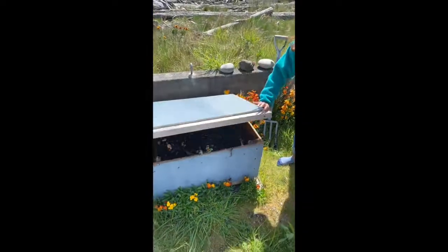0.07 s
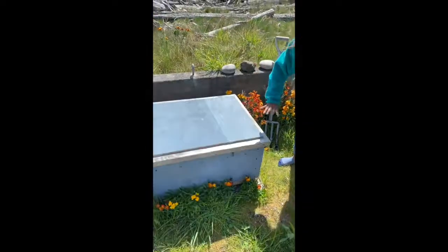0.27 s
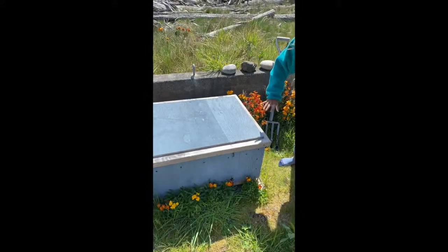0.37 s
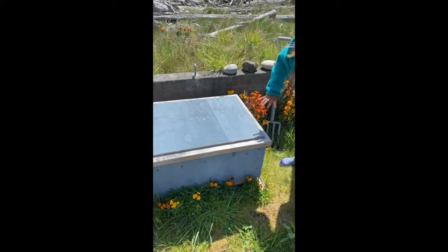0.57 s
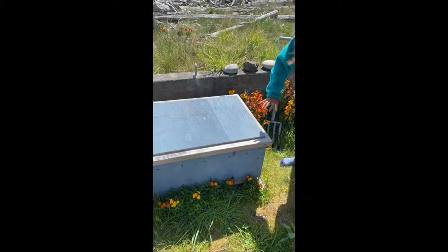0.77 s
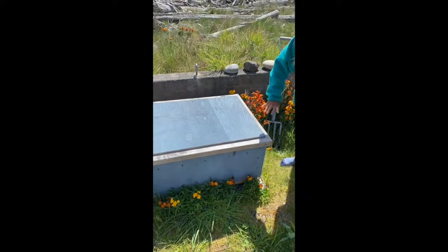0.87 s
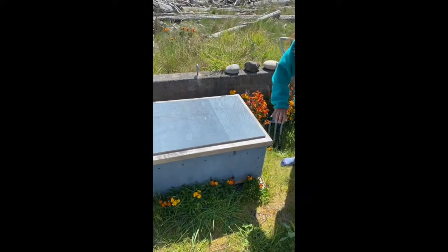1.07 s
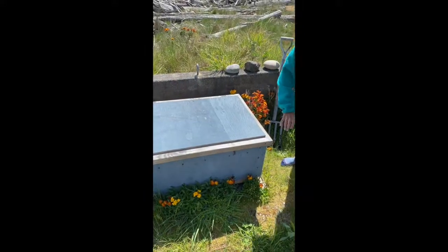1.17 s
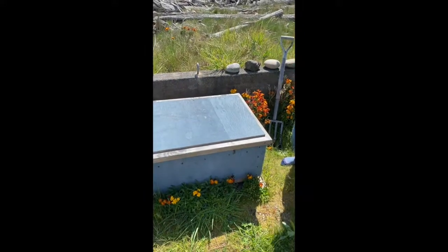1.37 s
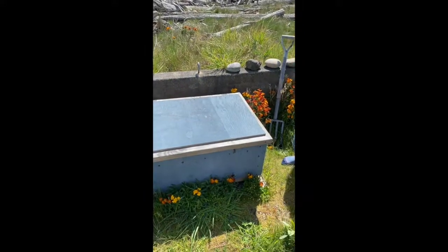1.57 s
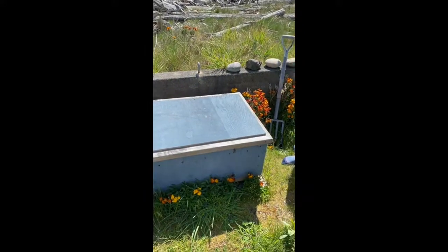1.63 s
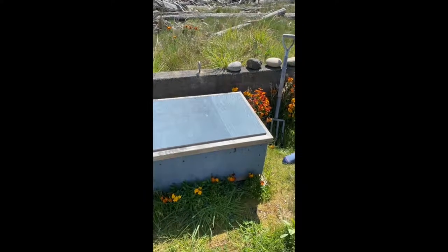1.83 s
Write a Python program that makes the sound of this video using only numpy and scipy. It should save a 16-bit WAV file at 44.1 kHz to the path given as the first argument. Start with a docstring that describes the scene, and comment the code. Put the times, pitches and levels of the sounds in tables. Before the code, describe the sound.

A plastic compost box lid falls with a soft swish and lands at about 0.3 seconds in one sharp, hollow thud, rattling briefly to rest a few steps away. Low, gusty wind buffets the microphone throughout. Faint distant birds whistle at the start, around 1 second and near 1.6 seconds. Clothing and garden plants rustle very lightly, with a few small dry snaps around 1.7 seconds.

```python
"""A plastic compost box lid drops shut in a garden, a few steps away.
From the start: a fading swish of the falling lid, wind buffeting the microphone, far bird whistles.
Clothing and plants rustle from about 0.2 s. At 0.3 s the rim lands in a quick run of contacts,
the panel rings, the box booms, and the lid rattles and ticks to rest.
Wind and birds go on; a thin hiss and small dry snaps come near the end."""
import sys
import numpy as np
from scipy import signal
from scipy.fft import rfft, irfft
from scipy.io import wavfile
from scipy.ndimage import uniform_filter1d

SR = 44100
rng = np.random.default_rng(int(sys.argv[2]) if len(sys.argv) > 2 else 0)


def master(y):
    """Save y as 16-bit WAV."""
    cut = np.clip(np.atleast_2d(y).T, -1, 1)
    pcm = np.round(cut * 32767)  # scale
    wavfile.write(sys.argv[1], SR, pcm.astype(np.int16))


N = 83790
T = np.arange(N) / SR
HZ = np.fft.rfftfreq(N, 1 / SR)

# noise spectra (frequency [Hz], relative density [dB])
AIR_SPECTRUM = [(100, 4), (900, 6.5), (2000, -12.5), (4000, -21), (7000, -23.5), (10000, -44),
                (13000, -25.5), (16000, -25.5)]
SWISH_SPECTRUM = [(300, -9.5), (800, 9), (1200, -4), (2000, -20), (4000, -33.5), (9000, -43)]
RUMBLE_SPECTRUM = [(15, -34.5), (30, -8.5), (48, 3), (70, 9), (110, 3), (170, -1.5), (260, -29),
                   (500, -82.5)]
FLUTTER_SPECTRUM = [(60, -25.5), (140, 0.5), (220, 4), (330, -2), (500, -11.5), (720, -17), (1000, -37),
                    (1500, -48), (2500, -70), (5000, -100)]
GUST_SPECTRUM = [(150, -5), (400, 11), (700, 6), (950, -6), (1400, -9), (2000, -32.5), (4000, -52),
                 (8000, -71)]
RUSTLE_SPECTRUM = [(800, -5.5), (2200, 4.5), (3500, -3.5), (7000, -5.5), (10000, -25.5), (13000, -8.5),
                   (16000, -10.5)]
HISS_SPECTRUM = [(1000, -8), (2200, -3), (4000, -6), (7500, -4.5), (10000, -24), (13000, 0), (16000, 0)]
SNAP_SPECTRUM = [(800, -3), (2500, -9), (7000, -2.5), (10000, -8), (13500, 1.5), (16000, -0.5)]
CRACK_SPECTRUM = [(200, -20), (1000, 15.5), (2000, -13.5), (4000, -6.5), (7800, -11), (9300, -29),
                  (11000, -34), (12800, -20.5), (16000, -26.5)]
RATTLE_SPECTRUM = [(100, 14), (400, 8), (1400, 1), (3000, -16), (5500, -24), (8000, -49.5), (16000, -50.5)]
# stereo width of the noises (frequency [Hz], side minus mid [dB])
NOISE_WIDTH = [(150, -71), (380, -48), (700, -9), (1250, 9.5), (2400, 0.5), (4400, -2.5), (9000, 12),
               (15000, 5)]
# wind on the microphone (time [s], rumble [dB], flutter [dB])
WIND_LEVELS = [(0, -54.5, -51.5), (.07, -27, -45.5), (0.128, -43.5, -54), (0.189, -45.5, -46),
               (.235, -24.5, -29.5), (0.281, -33, -39), (0.358, -31.5, -30), (.44, -22.5, -36.5),
               (.5, -30.5, -27), (0.559, -22.5, -28.5), (0.642, -21, -38), (.685, -41.5, -39),
               (0.732, -25, -36), (0.782, -32.5, -34), (.86, -32, -30.5), (.94, -25, -26),
               (0.981, -25, -33.5), (1.019, -31, -25.5), (1.099, -29.5, -38.5), (1.142, -22, -35.5),
               (1.21, -43, -36.5), (1.29, -25.5, -36), (1.33, -31.5, -33.5), (1.4, -25.5, -31.5),
               (1.469, -29, -32), (1.505, -20, -28), (1.538, -38.5, -40.5), (1.573, -25.5, -28),
               (1.651, -26, -44), (1.754, -53, -47.5), (1.797, -28.5, -41), (1.881, -40.5, -37)]
# fast gusts (centre [s], level [dB], half length [s])
FAST_GUSTS = [(0.5, -33, 0.02), (0.929, -51, 0.011)]
# single eddies (start [s], level [dB], slowing time [s])
EDDIES = [(.028, -27, 0.0028), (.064, -29, 0.0029), (.221, -24, .004), (.232, -24.5, 0.0047),
          (.45, -23, 0.0024), (.484, -21.5, 0.0081), (.51, -21.5, 0.0037), (.808, -26, 0.0024),
          (.84, -20.5, 0.0043), (.852, -16.5, .0065), (.904, -22, .004), (1.018, -24.5, .004),
          (1.148, -27.5, .003), (1.282, -20.5, .005), (1.378, -19, 0.0025), (1.446, -31, 0.0025),
          (1.487, -24.5, .003), (1.569, -21.5, .004)]
# bird calls, one list each (time [s], pitch [Hz], relative level [dB])
BIRD_CALLS = [
    [(.035, 3850, -72), (.07, 4000, -73.5), (.11, 4220, -65.5), (.135, 4330, -75), (.158, 4440, -65),
     (.19, 4180, -70.5), (.225, 3550, -70)],
    [(.858, 3900, -70), (.868, 4300, -67.5), (.876, 4750, -67.5), (.886, 4606, -79.5)],
    [(.893, 4480, -69.5), (.91, 4520, -67), (.945, 3980, -83), (.98, 4030, -70.5), (1.015, 4400, -76.5),
     (1.045, 4210, -77), (1.13, 4330, -98)],
    [(.915, 2390, -80), (.965, 2527, -71.5), (1, 2575, -81), (1.08, 2430, -86.5)],
    [(1.548, 4080, -68), (1.572, 4340, -63.5), (1.6, 4150, -73), (1.625, 4030, -69), (1.66, 4236, -62.5),
     (1.688, 3990, -75)],
]
# sleeve and plants brushing (centre [s], level [dB], half length [s])
BRUSHES = [(0.2, -65.5, 0.032), (0.516, -70.5, 0.037), (0.583, -62.5, 0.014), (0.646, -68.5, 0.04),
           (1.498, -74.5, 0.032)]
# dry hiss (time [s], level [dB])
HISS_LEVELS = [(1.19, -91), (1.25, -74.5), (1.43, -74), (1.49, -62.5), (1.56, -71.5), (1.73, -66),
               (1.76, -60), (1.79, -66.5), (1.9, -69.5)]
# stalk-like snaps (time [s], level [dB])
DRY_SNAPS = [(1.181, -66), (1.7, -48), (1.723, -52), (1.752, -50.5), (1.769, -52), (1.821, -54)]
# rim on box (time [s], impulse [dB], contact time [ms])
RIM_CONTACTS = [(0.2926, -21, 0.44), (0.296, -13, 0.11), (0.2977, -10.5, .15), (0.2993, -3, .12),
                (0.302, 3, 1)]
# panel modes (frequency [Hz], relative level [dB], T60 [s])
LID_MODES = [(183, -13, 0.1), (310, -10, 0.047), (391, -9, 0.06), (436, -11, 0.045), (544, -9.5, 0.052),
             (729, -1, 0.031), (980, -6, 0.021), (1055, -2.5, 0.036), (1395, -11, 0.034),
             (1464, -8.5, 0.031), (1662, -7, 0.021), (1945, -17, 0.029), (2303, -13, 0.028),
             (2952, -15, 0.021), (3670, -25, 0.024), (4102, -16.5, 0.024), (5460, -20, 0.021)]
# impact balance (frequency [Hz], left minus right [dB])
LID_BALANCE = [(450, 0), (700, -5.5), (1000, -9), (1400, 2), (1900, -8), (2400, 0), (3000, -3.5), (5600, 0)]
# impact phase (frequency [Hz], left minus right [rad])
LID_PHASE = [(20, 0), (560, 0), (780, -1.5), (1000, -2.3), (1200, -4.2), (1400, -4.9), (4000, -5.2),
             (7000, -3.9), (10000, -3.1), (16000, -1)]
# rim settling (time [s], level [dB])
RIM_TICKS = [(0.3071, -39), (.329, -53.5), (.337, -49), (.349, -50), (0.365, -50)]


def amp(db):
    """Decibels to gain."""
    return 10 ** (np.asarray(db) / 20)


def unit(x):
    """Scale to unit rms."""
    return x / np.sqrt(np.mean(x ** 2) + 1e-20)


def curve(points):
    """Table interpolated over log frequency."""
    hz, value = np.transpose(points)
    return np.interp(np.log(HZ + 1), np.log(hz + 1), value)


def noise(spectrum, envelope=1):
    """Coloured stereo noise: alike in the bass, apart in the treble."""
    white = rng.standard_normal((2, N))
    mid, side = rfft(white * envelope) * unit(amp(curve(spectrum)))
    side *= amp(curve(NOISE_WIDTH))
    return irfft(np.array([mid + side, mid - side]), N)


def wobble(cutoff_hz):
    """Low-passed random signal, unit rms."""
    return unit(irfft(rfft(rng.standard_normal(N)) / (1 + (HZ / cutoff_hz) ** 4), N))


def decay(start_s, t60_s):
    """Instant onset, exponential fall."""
    return (T >= start_s) * amp(-60 * np.maximum(T - start_s, 0) / t60_s)


def swells(rows):
    """Sum of Gaussian envelopes."""
    return sum(amp(db) * np.exp(-.5 * ((T - centre_s) / half_s) ** 2) for centre_s, db, half_s in rows)


def convolve(a, b):
    """Convolution, cut to N samples."""
    return irfft(rfft(a, 2 * N) * rfft(b, 2 * N))[..., :N]


def steady(x):
    """Even out slow level swings."""
    return x / np.sqrt(uniform_filter1d((x ** 2).mean(0), 1800) + 1e-9)


def air():
    """Quiet garden, plus a fading swish of air from the falling lid."""
    garden = amp(-65.5) * noise(AIR_SPECTRUM)
    swish = amp(-47.5) * noise(SWISH_SPECTRUM) * decay(0, t60_s=1)
    return garden + swish


def wind():
    """Eddies on the microphone: rumble, lumpy flutter, rasp of fast gusts, single buffets."""
    times_s, rumble_db, flutter_db = np.transpose(WIND_LEVELS)
    rumble = steady(noise(RUMBLE_SPECTRUM)) * amp(np.interp(T, times_s, rumble_db))
    lumps = amp(4.5 * wobble(90))
    flutter = steady(noise(FLUTTER_SPECTRUM, lumps)) * amp(np.interp(T, times_s, flutter_db))
    rasp = noise(GUST_SPECTRUM, amp(8 * wobble(160)) * swells(FAST_GUSTS))
    return rumble + flutter + rasp + sum(buffet(*eddy) for eddy in EDDIES)


def buffet(start_s, db, slowing_s, start_hz=903.4, end_hz=70):
    """One eddy hits the microphone: swells and dies as its pitch drops to a thump."""
    age_s = np.maximum(T - start_s, 0)
    hz = end_hz + (start_hz - end_hz) * np.exp(-age_s / slowing_s)
    life = age_s / (1.68 * slowing_s)  # 1 at the peak
    envelope = amp(db) * (life * np.exp(1 - life)) ** 2
    return envelope * np.sin(2 * np.pi * (np.cumsum(hz) / SR + rng.random()))


def birds():
    """Gliding pure whistles, blurred by the garden's echo."""
    song = np.zeros(N)
    for call in BIRD_CALLS:
        times_s, hz, db = np.transpose(call)
        gate = uniform_filter1d(1. * (T > times_s[0]) * (T < times_s[-1]), size=200)
        pitch_hz = uniform_filter1d(np.interp(T, times_s, hz), size=400) * (1 + .005 * wobble(100))
        level_db = np.interp(T, times_s, db) + 2.4 * wobble(70)
        song += gate * amp(level_db) * np.sin(2 * np.pi * np.cumsum(pitch_hz) / SR)
    echo = rng.standard_normal((2, N)) * decay(.0082, t60_s=.3)
    echo /= np.linalg.norm(echo[0])
    return amp(-1.5) * (song + amp(-4) * convolve(song, echo))


def rustle():
    """Sleeve and plants: grainy brushing, thin hiss, stalk-like snaps."""
    grain = amp(2.5 * wobble(340))
    brushing = noise(RUSTLE_SPECTRUM, grain * swells(BRUSHES))
    hiss = noise(HISS_SPECTRUM, grain * amp(np.interp(T, *np.transpose(HISS_LEVELS))))
    bursts = sum(amp(db) * decay(start_s, t60_s=.011) for start_s, db in DRY_SNAPS)
    return brushing + hiss + noise(SNAP_SPECTRUM, grain * bursts)


def panel():
    """Rim contacts push on the lid: ringing modes and a short crack."""
    force = np.zeros(N)
    for start_s, db, contact_ms in RIM_CONTACTS:
        progress = np.maximum(T - start_s, 0) * 1000 / contact_ms
        push = progress * np.exp(-4 * progress)
        force += amp(db) * push / push.sum()
    ring = sum(amp(db) * decay(0, t60_s) * np.sin(2 * np.pi * hz * T) for hz, db, t60_s in LID_MODES)
    crack = noise(CRACK_SPECTRUM)[0] * decay(0, t60_s=.011)
    return convolve(force, amp(-4.5) * ring + amp(-20) * crack)


def scrape(peak_s=.2988, rise_s=.0037, fall_s=.0016):
    """Rim slides over the box edge."""
    envelope = np.exp(-np.maximum((peak_s - T) / rise_s, (T - peak_s) / fall_s))
    return amp(-17) * noise(CRACK_SPECTRUM).mean(0) * envelope


def boom(start_s, hz=80.3, rise_s=.0021):
    """Low box resonance under the landing lid."""
    age_s = np.maximum(T - start_s, 0)
    envelope = (1 - np.exp(-age_s / rise_s)) * decay(start_s, t60_s=.115)
    return -envelope * np.sin(2 * np.pi * hz * age_s)


def lid(shut_s=.302):
    """Lid lands: panel, scrape and boom placed in stereo, then a faint rattle."""
    impact = rfft(panel() + scrape() + boom(shut_s))
    pan = amp(curve(LID_BALANCE) / 2) * np.exp(.5j * curve(LID_PHASE))
    rattle = amp(-34) * noise(RATTLE_SPECTRUM) * decay(shut_s, t60_s=.25) * amp(4.1 * wobble(170))
    return irfft(np.array([impact * pan, impact / pan]), N) + rattle


def settling():
    """Rim ticks against the box as the lid comes to rest."""
    return noise(CRACK_SPECTRUM, sum(amp(db) * decay(start_s, t60_s=.025) for start_s, db in RIM_TICKS))


def scene():
    """All sources at the microphone."""
    return air() + wind() + birds() + rustle() + lid() + settling()


def record(dry, low_cut_hz=13, ceiling=.93, high_cut_hz=15900):
    """Low cut, soft peak clipping, band limit."""
    cut = signal.sosfilt(signal.butter(2, low_cut_hz, "high", fs=SR, output="sos"), dry)
    clipped = cut / (1 + (cut / ceiling) ** 8) ** (1 / 8)
    lowpass = signal.firwin(511, high_cut_hz, window=("kaiser", 9), fs=SR)
    return signal.oaconvolve(clipped, lowpass[None], "same")


dry = scene()
out = record(dry)
master(out)
```